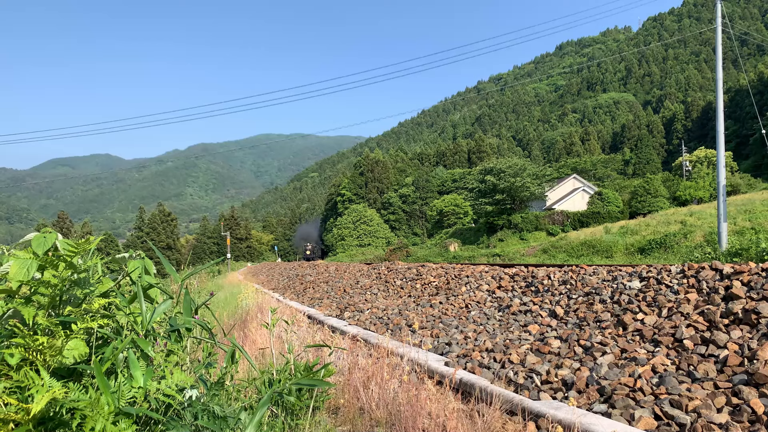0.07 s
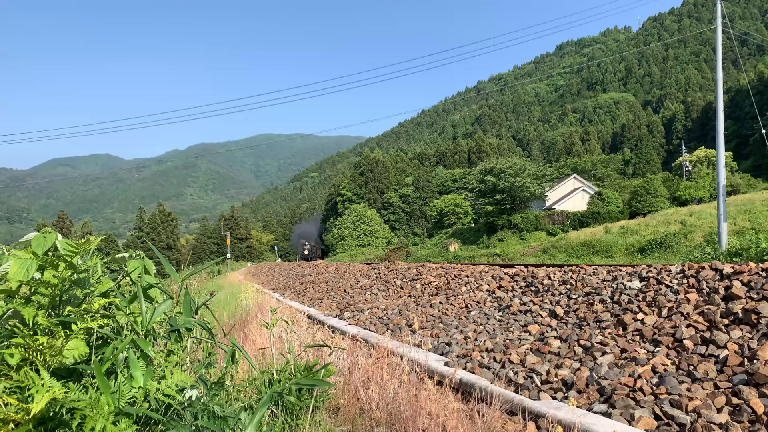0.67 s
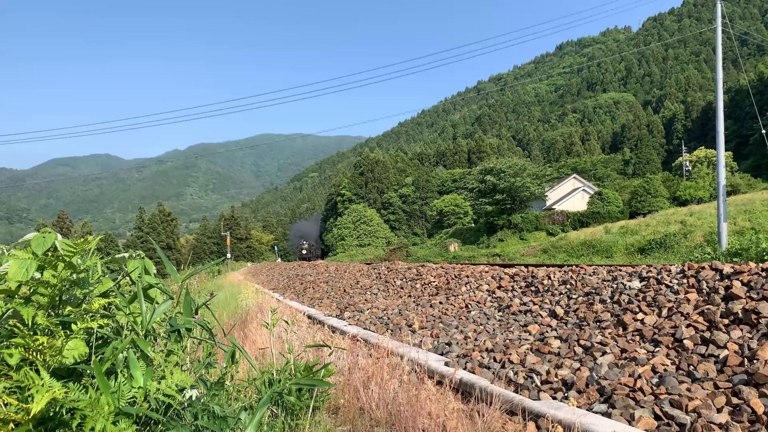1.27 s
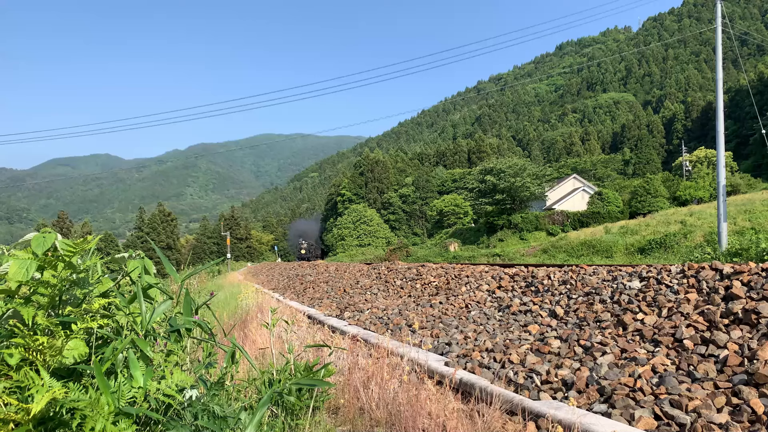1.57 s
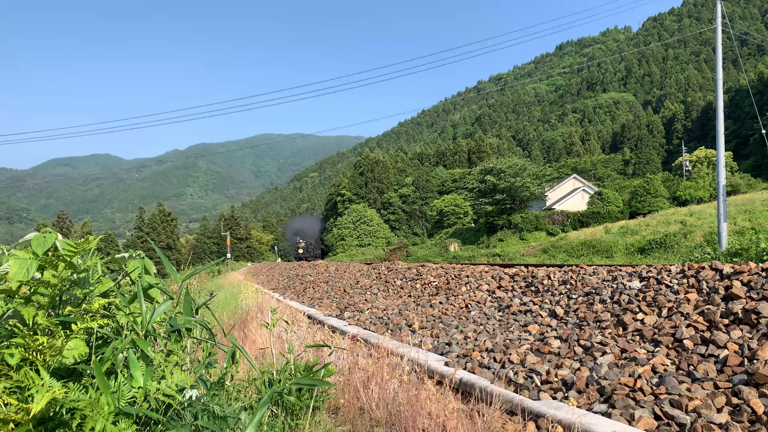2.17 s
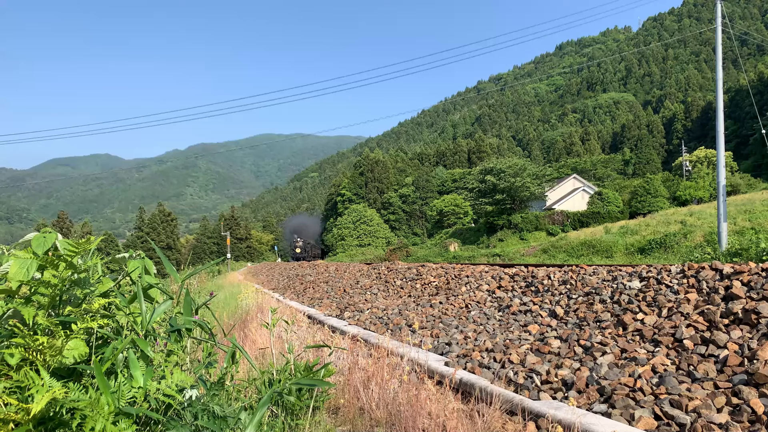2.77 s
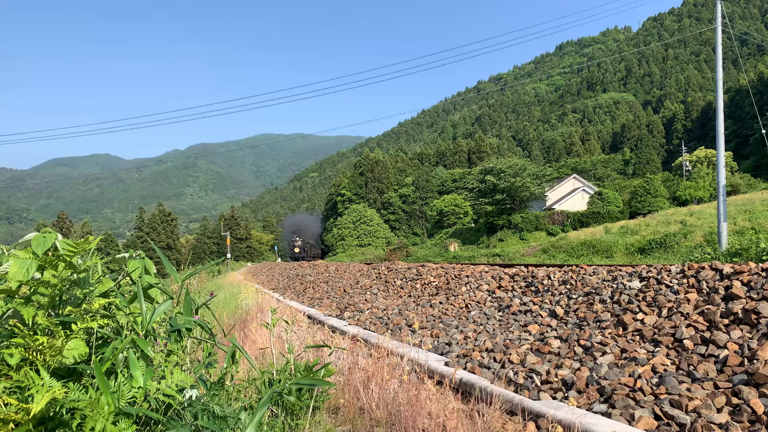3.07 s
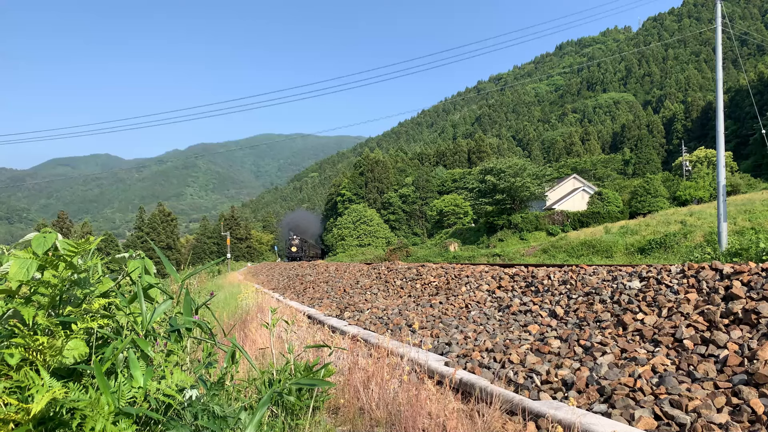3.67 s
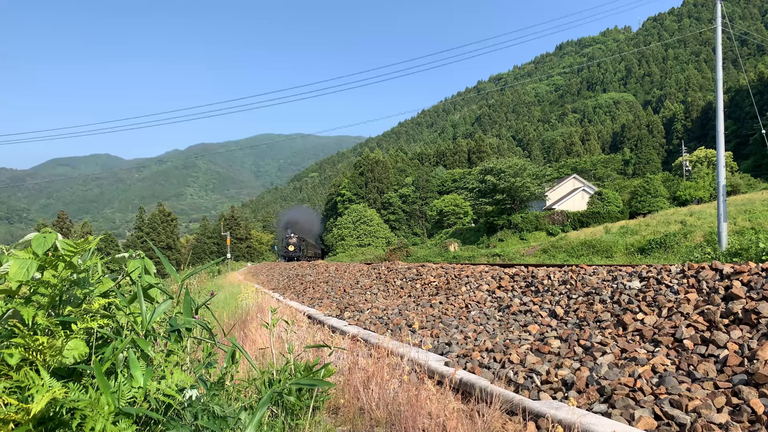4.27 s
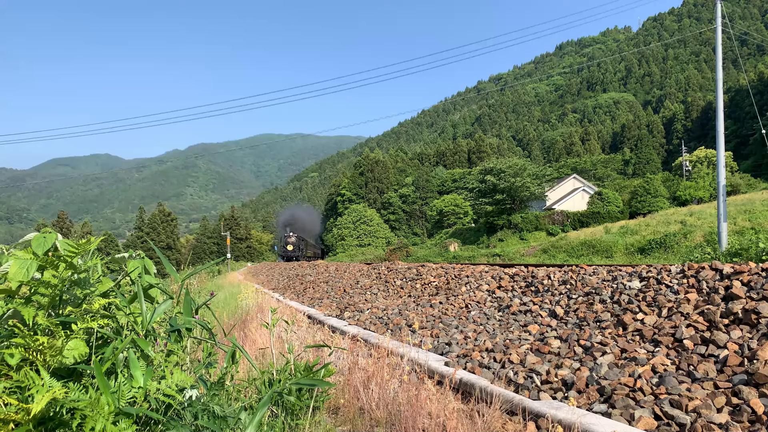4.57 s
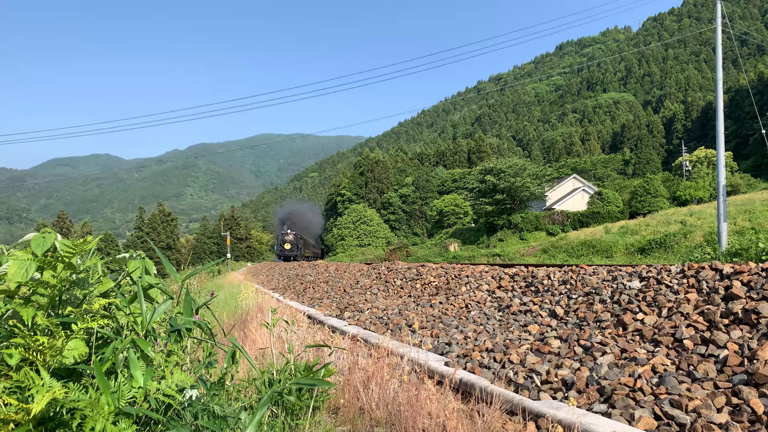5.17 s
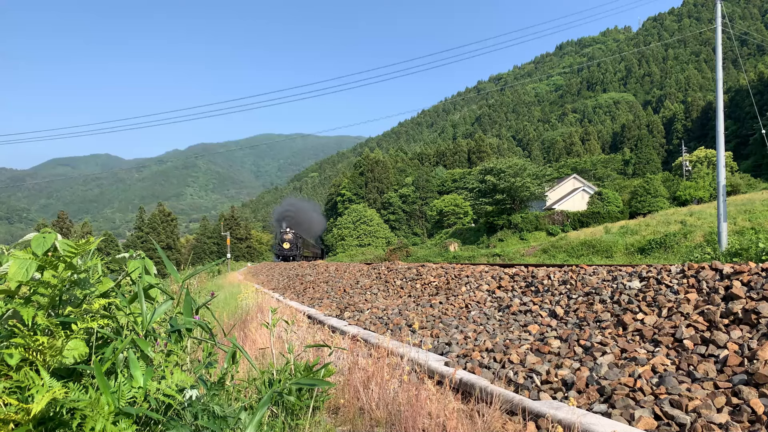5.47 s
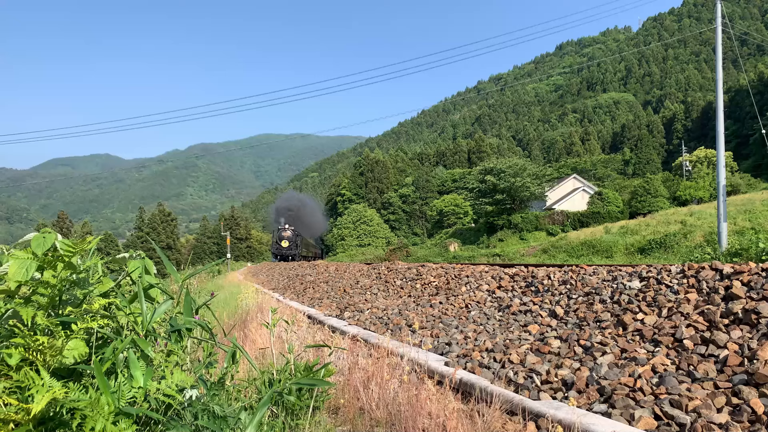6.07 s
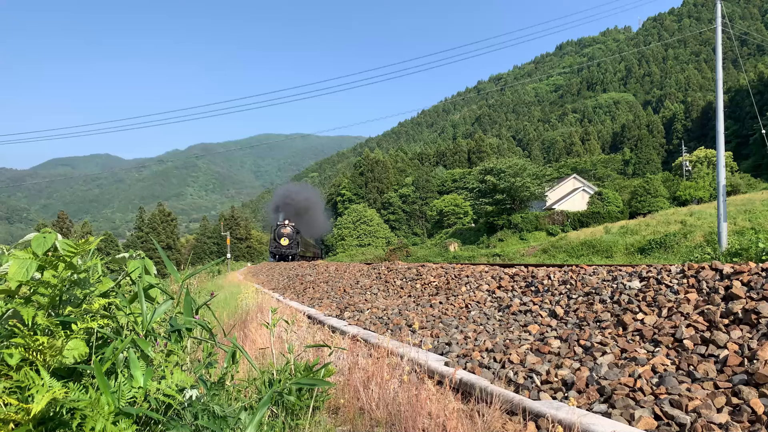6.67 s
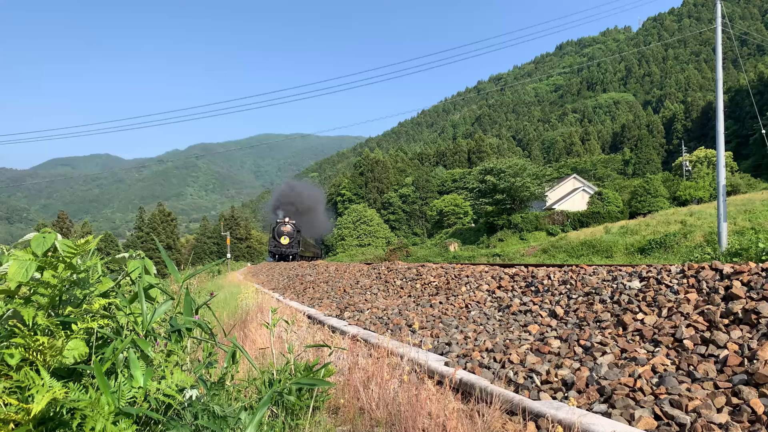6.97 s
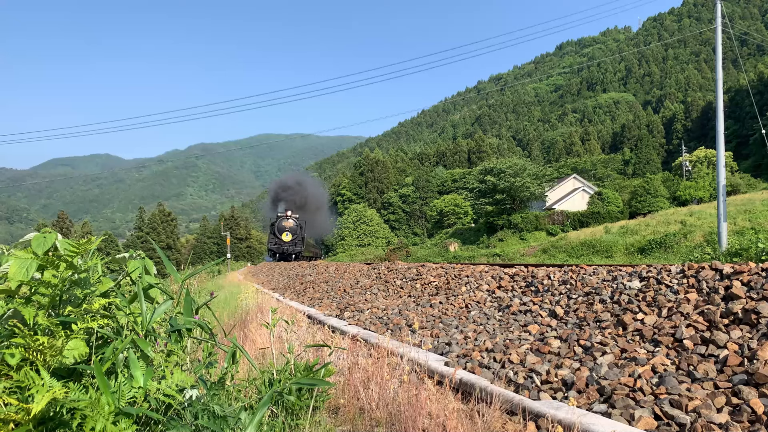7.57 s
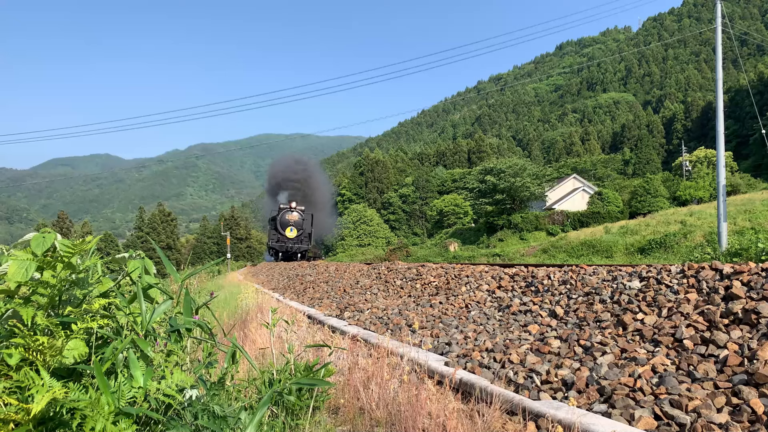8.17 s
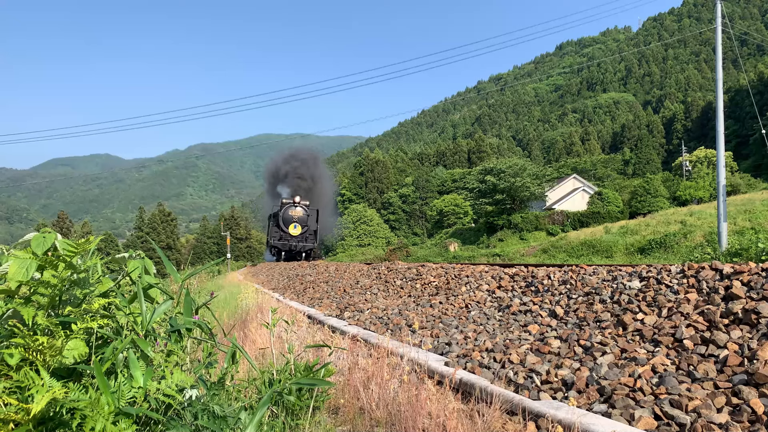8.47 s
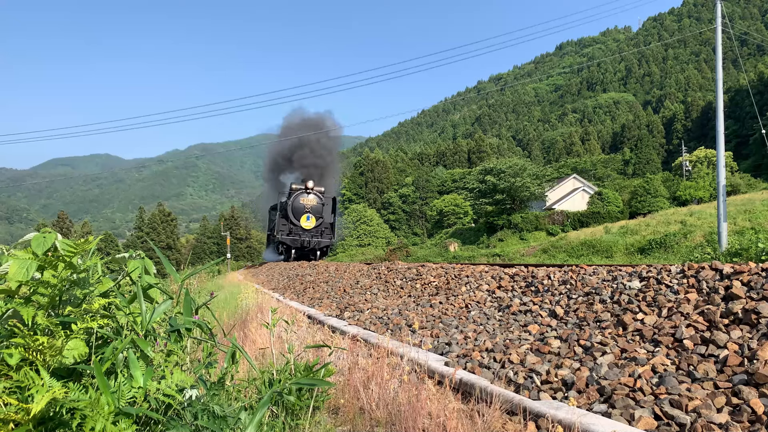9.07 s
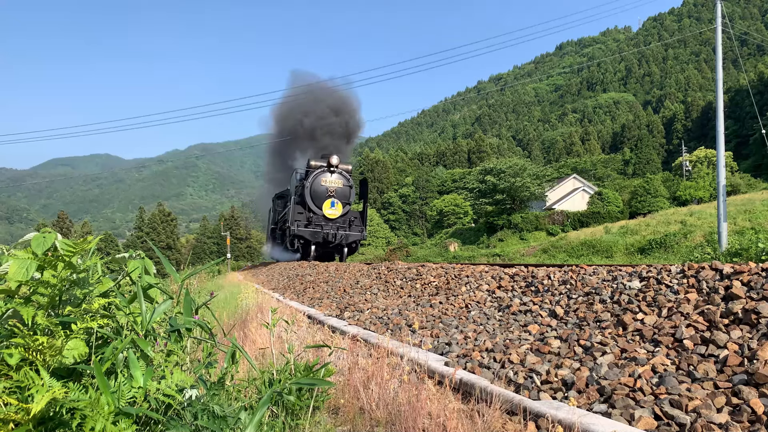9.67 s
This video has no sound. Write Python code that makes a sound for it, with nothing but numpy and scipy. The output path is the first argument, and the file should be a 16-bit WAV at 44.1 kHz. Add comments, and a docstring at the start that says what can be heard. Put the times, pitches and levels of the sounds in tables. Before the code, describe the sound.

A distant steam train rumbles softly, then sounds a breathy whistle of several notes at once and holds it throughout its approach. The whistle starts soft and low, slowly rising and brightening while rushing steam swells around it and the valley throws back a slightly lower echo. Heard from beside the track, it becomes loud enough to overload the microphone, going flat just at the end.

```python
"""Wheels rumble and steam leaks as a locomotive comes up a wooded valley at a steady speed.
About half a second in, its five-chime whistle opens for one long blast, and the hillside throws the
chord back a little lower. Rising steam pressure makes the chord sharper, stronger and brighter and
swells the jet's roar and hiss. The shrinking distance makes the train louder and drives the microphone
ever deeper into overload. In the last second the pressure sags and the chord goes flat."""
import sys
import numpy as np
from scipy import signal
from scipy.fft import rfft, irfft
from scipy.io import wavfile
from scipy.ndimage import map_coordinates

SR = 44100
rng = np.random.default_rng(int(sys.argv[2]) if len(sys.argv) > 2 else 0)


def persist_wave(psi):
    """Save psi, clipped to +-1, as 16-bit WAV."""
    counts = np.round(np.clip(psi, -1, 1) * 32767).astype(np.int16)
    wavfile.write(sys.argv[1], SR, np.atleast_2d(counts).T)


N = 437472
TIME = np.arange(N) / SR
BLAST_START_S = 0.56

# the broad roar of a steam jet: frequency_hz, relative_db
ROAR_SPECTRUM = [(230, -39), (350, -3.5), (600, 3.5), (900, -3.5), (1200, -1), (1500, 1.5), (2000, 0),
                 (2500, -1), (2850, -3), (3300, -11.5), (5000, -27), (9000, -32), (15000, -62)]
# the thin hiss above it: frequency_hz, relative_db
HISS_SPECTRUM = [(2500, -12.5), (3700, -2), (4700, 1), (5500, -2), (6500, -6), (7900, -7.5), (9200, -22),
                 (12000, -26.5), (15500, -50)]


def from_db(db):
    """Decibels to gain."""
    return 10 ** (np.asarray(db) / 20)


def unit_power(x):
    """Scale to an RMS of 1."""
    return x / np.sqrt(np.mean(x ** 2) + 1e-20)


def bump(centre_s, length_s):
    """A bell-shaped swell of height 1."""
    return np.exp(-2 * ((TIME - centre_s) / length_s) ** 2)


def drift(rate_hz):
    """A smooth random wander of unit power that turns about rate_hz times a second."""
    step, settle = 40, 2000
    pole = np.exp(-2 * np.pi * rate_hz * step / SR)
    white = rng.standard_normal(N // step + settle + 2)
    slow = signal.lfilter([1], [1, -2 * pole, pole * pole], white)[settle:]
    return np.interp(np.arange(N) / step, np.arange(len(slow)), unit_power(slow))


def log_bins():
    """Log frequency of each FFT bin."""
    return np.log(np.maximum(np.arange(N // 2 + 1) * SR / N, 1))


def noise(spectrum):
    """Steady coloured noise of unit power."""
    hz, db = np.transpose(spectrum)
    gain = from_db(np.interp(log_bins(), np.log(hz), db, left=-90, right=-90))
    return unit_power(irfft(rfft(rng.standard_normal(N)) * gain, N))


def bandpass(x, low_hz, high_hz):
    """Roll off the lows and the highs gently."""
    return signal.sosfilt(signal.butter(2, [low_hz, high_hz], "band", fs=SR, output="sos"), x)


def distance_m(start_m=174.4, speed_m_per_s=15.39, trackside_m=4):
    """How far off the approaching engine is."""
    return np.hypot(start_m - speed_m_per_s * TIME, trackside_m)


def spreading(reference_m=50):
    """A gain of 1 at the reference distance, falling 6 dB with each doubling."""
    return from_db(20 * np.log10(reference_m / distance_m()))


def valve_opening(attack_s=0.045):
    """The whistle valve cracks open, from 0 to 1."""
    return np.clip((TIME - BLAST_START_S) / attack_s, 0, 1)


def pressure():
    """Steam pressure at the whistle: 0 is barely speaking, 1 is full."""
    # the long rise and late sag: time_s, pressure_share
    pressure_curve = [(1.15, 0.0096), (1.6, 0.09), (2, 0.22), (2.4, 0.31), (2.75, .43), (3.1, 0.51),
                      (3.5, 0.64), (4.2, 0.74), (4.9, 0.79), (5.4, .82), (6.6, 0.92), (7.2, 0.95),
                      (7.9, 0.98), (8.6, .95), (9.1, 0.87), (9.3, .76), (9.79, 0.68), (9.92, .34)]
    return np.interp(TIME, *np.transpose(pressure_curve))


def by_pressure(law):
    """Follow a curve of level against steam pressure."""
    return np.interp(pressure(), *np.transpose(law))


def valley(level_db=-59):
    """The quiet of the valley, a faint steady bed."""
    # outdoor ambience: frequency_hz, relative_db
    valley_spectrum = [(60, 0), (300, -13), (900, 2.5), (1300, -9), (2800, -5.5), (3400, -14.5),
                       (6500, -23), (10000, -39), (15500, -35)]
    return from_db(level_db) * noise(valley_spectrum)


def running_gear():
    """Wheels rumble under a hollow drone."""
    # wheel rumble: frequency_hz, relative_db
    rumble_spectrum = [(12, -13), (25, 3), (60, 1), (85, 1), (130, -3.5), (250, -14), (600, -18)]
    # hollow drone: frequency_hz, relative_db
    drone_spectrum = [(100, 0.5), (150, -8), (190, 9), (220, -0.5), (255, -6.5), (320, -10), (450, -10.5),
                      (900, -15.5)]
    # low rumble and drone levels before the distance gain: time_s, rumble_db, drone_db
    # the drone's swell near 5 s stands for overload thickening the low end
    low_end_levels = [(0, -44, -45), (1.5, -43.5, -44.5), (1.8, -45.5, -43), (3, -39, -42.5),
                      (4.2, -43, -44.5), (5.3, -40, -37.5), (8.6, -42.5, -45), (9.3, -34.5, -44),
                      (9.9, -37, -34.5)]
    time_s, rumble_db, drone_db = np.transpose(low_end_levels)
    rumble = from_db(np.interp(TIME, time_s, rumble_db)) * noise(rumble_spectrum)
    drone = from_db(np.interp(TIME, time_s, drone_db)) * noise(drone_spectrum)
    return (rumble + drone) * spreading()


def hillside(chord):
    """Echoes on lengthening paths come back flat; they count for less once the engine is close."""
    # reflections: delay_s, added_delay_s_per_s, relative_db
    echo_paths = [(.05, .013, -10.5), (0.12, .028, -16.5), (0.087, 0.03, -32), (.14, .058, -8),
                  (0.13, 0.071, -35)]
    echoes = sum(from_db(db) * np.interp(TIME * (1 - stretch) - delay_s, TIME, chord, left=0)
                 for delay_s, stretch, db in echo_paths)
    return_db = np.interp(distance_m(), [65, 155], [-3, 8])
    return bandpass(echoes, low_hz=620, high_hz=1400) * from_db(return_db)


def steam_spurts():
    """Short swells of hiss and upper roar, with the lows and the very top rolled off."""
    # spurts ahead of the filter: centre_s, length_s, roar_db, hiss_db
    spurts = [(2.489, 0.028, -42, -60), (2.961, 0.047, -39, -52), (3.224, 0.047, -37, -58),
              (3.33, .04, -37, -48), (3.957, 0.042, -35, -39.5), (4.14, .069, -46, -42),
              (4.406, 0.017, -37, -46), (4.833, .025, -31, -52), (5.37, 0.039, -42, -52),
              (5.523, 0.022, -42, -34), (5.87, 0.17, -32, -37.5), (6.143, 0.041, -28, -32),
              (6.757, 0.23, -26, -32), (7.435, 0.088, -20.5, -31), (8.38, 0.26, -22.5, -34)]
    roar = sum(from_db(db) * bump(s, length_s) for s, length_s, db, _ in spurts) * noise(ROAR_SPECTRUM)
    hiss = sum(from_db(db) * bump(s, length_s) for s, length_s, _, db in spurts) * noise(HISS_SPECTRUM)
    return bandpass(roar + hiss, low_hz=1500, high_hz=11000)


def flaring(jet, flare_db=2.0, rate_hz=14, band_count=10):
    """Bands of the jet flare up briefly, each on its own."""
    spectrum = rfft(jet)
    log_centres = np.log(np.geomspace(800, 3200, band_count))
    bands = (irfft(spectrum * np.interp(log_bins(), log_centres, peak), N)
             for peak in np.eye(band_count))
    return unit_power(sum(band * from_db(flare_db * drift(rate_hz)) for band in bands))


def steam_jet(roar_flicker_db=1.15, sputter_db=1.5, chirr_db=-5, chirr_flicker_db=3.2, leak_share=0.58):
    """The jet roars; a thinner hiss sputters on top, with a chirr in it. All grow with pressure."""
    # growth of the roar: pressure_share, level_db at the reference distance
    roar_law = [(0, -46), (.3, -38), (.4, -34), (.72, -28.5), (.8, -25.5), (1, -21.5)]
    # the hiss sets in steeply once the jet runs fast: pressure_share, level_db at the reference distance
    hiss_law = [(0, -57.5), (.3, -51.5), (.6, -45.5), (.72, -37.5), (1, -32)]
    # the narrow, fluttering chirr: frequency_hz, relative_db
    chirr_spectrum = [(3600, -15), (4300, -8.5), (4650, -7), (5100, -9.5), (6000, -27)]
    # the very top of the hiss: frequency_hz, relative_db
    sizzle_spectrum = [(6000, 9), (9000, -1), (12000, -5.5), (15500, -8)]
    roar_db, hiss_db = by_pressure(roar_law), by_pressure(hiss_law)
    # the roar rises in pitch as the jet gathers speed
    jet_speed = 1 - .19 * (1 - pressure()) ** 2.6
    jet = map_coordinates(noise(ROAR_SPECTRUM), [np.cumsum(jet_speed)], order=3, mode="wrap")
    roar = from_db(roar_db + roar_flicker_db * drift(23)) * flaring(jet)
    hiss = from_db(hiss_db + sputter_db * drift(52)) * noise(HISS_SPECTRUM)
    chirr = from_db(hiss_db + chirr_db + chirr_flicker_db * drift(32)) * noise(chirr_spectrum)
    # the air swallows the top octave until the engine is near
    air_db = np.interp(distance_m(), [66, 101], [-8, -28])
    sizzle = from_db(hiss_db + air_db) * noise(sizzle_spectrum)
    flow = np.maximum(valve_opening(), leak_share)   # steam leaks before the blast
    return (roar + hiss + chirr + sizzle) * flow * spreading()


def partial(phase, flutter, rate_hz):
    """A tone of unit power, its level and phase shaken by turbulent air."""
    in_phase = (1 + flutter * drift(rate_hz)) * np.cos(phase)
    quadrature = flutter * drift(rate_hz) * np.sin(phase)
    return (in_phase + quadrature) / np.sqrt(.5 + flutter ** 2)


def whistle(waver_share=0.002284, fading_db=0.37, start_loss_db=11.5,
            lock_hz=769.7, lock_range_hz=15.5, lock_gain_db=2.5):
    """Five pipes on one steam supply, four harmonics each, sharper and louder with pressure."""
    # the pipes, lowest first, at full pressure and what they lose when barely speaking:
    # pitch_hz, flat_hz, pitch_exponent, level_db at the reference distance, loss_db, level_exponent,
    # build_up_s
    chimes = [(381.3, 13, 1.05, -20, 18, 0.92, 0.1), (474.2, 40, 1.25, -15, 21.5, 0.94, 0.16),
              (554.3, 52, .85, -20.5, 25, 0.88, 0.31), (651.1, 72, .95, -21.5, 21, 0.83, 0.31),
              (798.1, 103, 1.35, -25.5, 25.5, 2.07, 0.26)]
    # each pipe's timbre before the bloom: harmonic_2_db, harmonic_3_db, harmonic_4_db, flutter_share
    timbres = [(-8, -8, -15.5, 0.13), (-16.5, -12, -12.5, 0.13), (-8, -15.5, -30, 0.32),
               (-14.5, -24, -30, 0.24), (-8.5, -21, -27.5, 0.39)]
    # swells and dips, one list per pipe: centre_s, length_s, change_db
    pipe_swells = [
        [(1.08, 0.17, -6.5), (5.2, 0.46, -2), (9.65, 0.53, 2)],
        [(.98, .3, 3), (2.6, 0.28, -4), (4.05, 0.53, -0.5), (8.6, 0.23, 1.5)],
        [(2.7, 0.14, -2), (3.35, 0.11, 5)],
        [(3.15, .3, 4), (5.3, 1.0, -7), (7.6, 0.63, 3), (9.22, 0.27, -5), (9.66, .2, 7)],
        [(2.25, 0.36, 3.5), (3.1, 0.45, -2.5), (4.2, 0.13, -1.5), (4.55, 0.17, -3), (5.13, 0.059, 4),
         (5.75, 0.24, 6), (7.47, 0.067, 6.5), (8.4, 0.32, 5), (9.75, 0.26, 5)],
    ]
    # the overtones bloom as pressure nears full: pressure_share, gain_db
    bloom_law = [(0, -12), (.4, -5.5), (.7, -6), (.83, -1), (1, -0.5)]
    slack, bloom_db = 1 - pressure(), by_pressure(bloom_law)
    supply_waver = drift(5.1)
    turbulence = np.interp(distance_m(), [100, 143], [1, 3.2])   # a long air path shakes the notes more
    pitches_hz = [full_hz - flat_hz * slack ** exponent for full_hz, flat_hz, exponent, *_ in chimes]
    # near the octave the outer pipes lock: the lowest is pulled along and the top one firms up
    top_hz = pitches_hz[-1]
    lock = 1 / (1 + np.abs((top_hz - lock_hz) / lock_range_hz) ** 10)
    chord = 0
    for chime, hz, (*overtones_db, flutter), swells in zip(chimes, pitches_hz, timbres, pipe_swells):
        full_db, loss_db, exponent, build_up_s = chime[3:]
        level_db = full_db - loss_db * slack ** exponent
        level_db -= start_loss_db * np.exp(-np.maximum(TIME - BLAST_START_S, 0) / build_up_s)
        level_db += sum(db * bump(s, length_s) for s, length_s, db in swells)
        level_db += fading_db * drift(2.9)
        if chime is chimes[0]:
            hz = hz + lock * (top_hz / 2 - hz)
        if chime is chimes[-1]:
            level_db += lock_gain_db * lock
            flutter = flutter * (1 - .5 * lock)
        waver = waver_share * (.5 * supply_waver + drift(25.9))
        phase = 2 * np.pi * np.cumsum(hz * (1 + waver)) / SR
        tone = partial(phase, flutter * turbulence, rate_hz=15)
        for harmonic, overtone_db in enumerate(overtones_db, 2):
            tone += from_db(overtone_db + bloom_db) * partial(harmonic * phase, flutter=1.25, rate_hz=13)
        chord = chord + from_db(level_db) * tone
    return chord * valve_opening() * spreading()


def scene():
    """Train, echoes and valley meet in mono beside the track."""
    chord = whistle()
    ambience = valley()
    return (chord + hillside(chord) + steam_jet() + steam_spurts() + running_gear() + ambience)[None]


def record(dry, ceiling=0.14, knee=36, cutoff_hz=15700):
    """Hard overload: single peaks crackle at first, then the loud chord is squared; the top is cut."""
    clipped = dry / (1 + np.abs(dry / ceiling) ** knee) ** (1 / knee)
    return signal.sosfilt(signal.ellip(10, .2, 80, cutoff_hz, fs=SR, output="sos"), clipped)


dry = scene()
out = record(dry)
persist_wave(out)
```